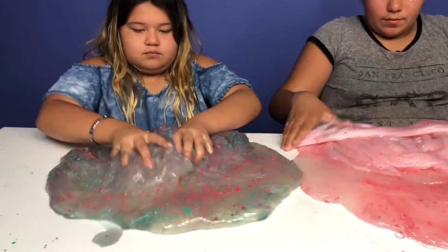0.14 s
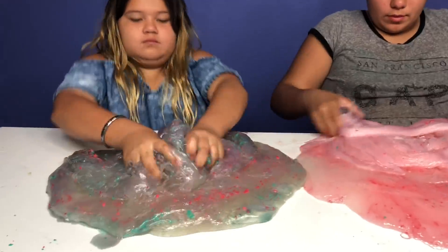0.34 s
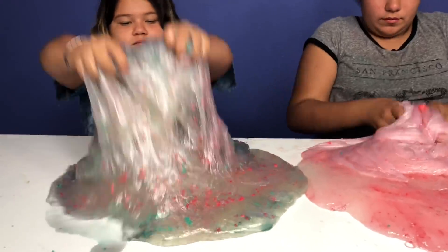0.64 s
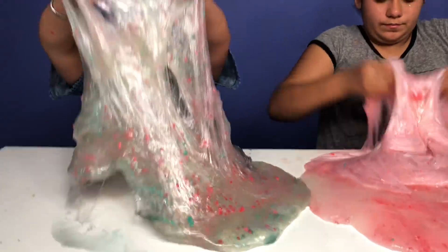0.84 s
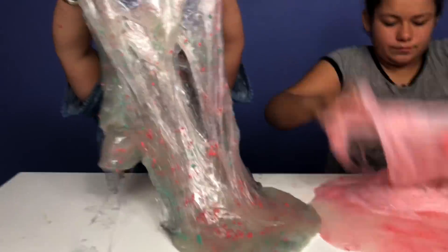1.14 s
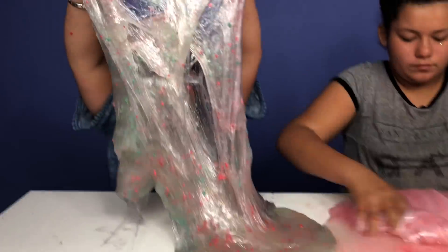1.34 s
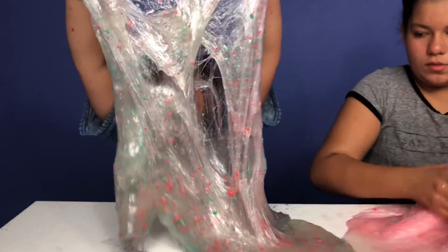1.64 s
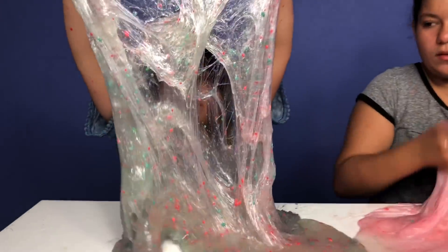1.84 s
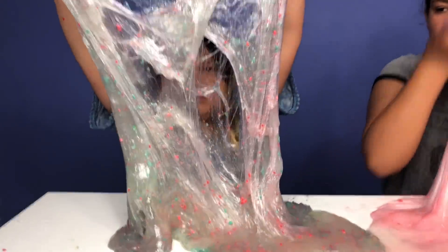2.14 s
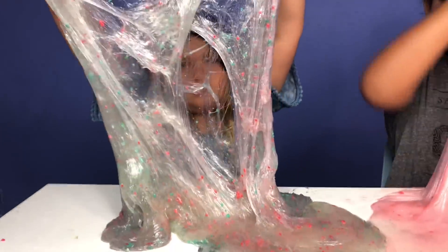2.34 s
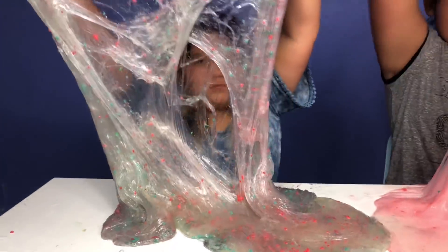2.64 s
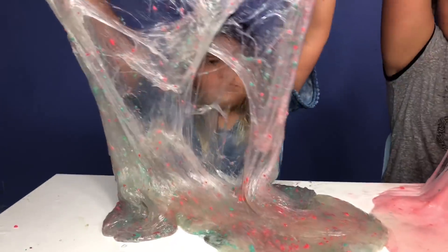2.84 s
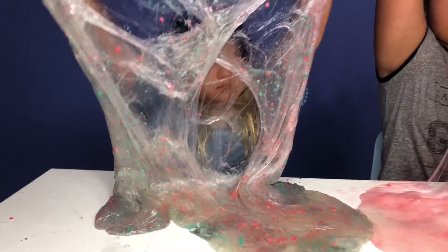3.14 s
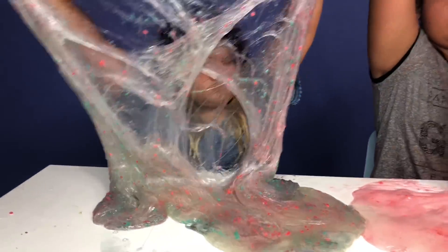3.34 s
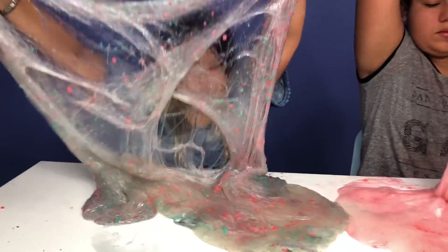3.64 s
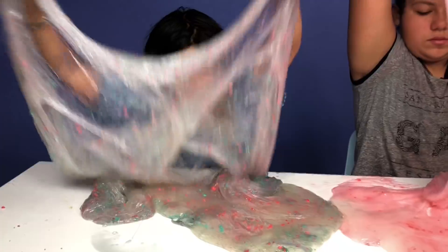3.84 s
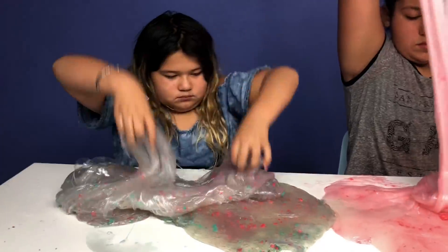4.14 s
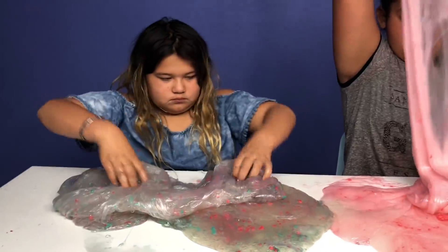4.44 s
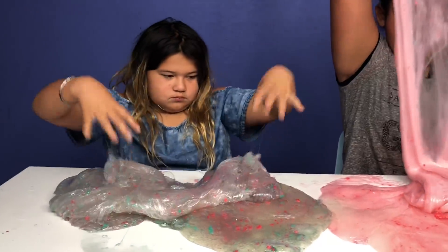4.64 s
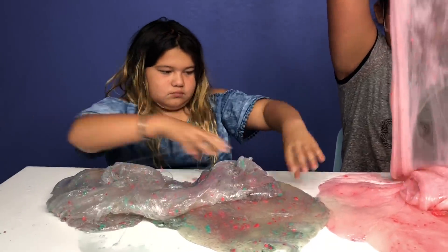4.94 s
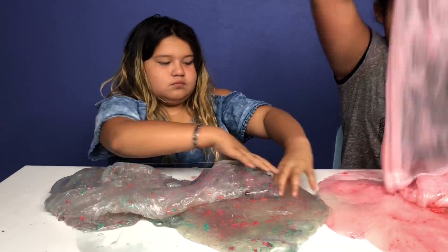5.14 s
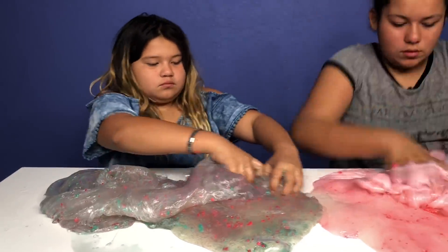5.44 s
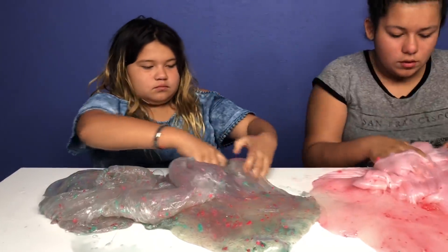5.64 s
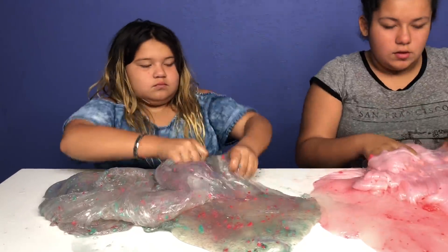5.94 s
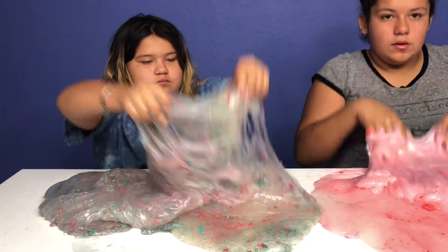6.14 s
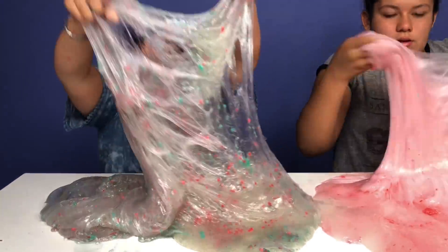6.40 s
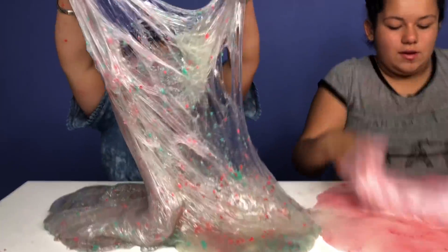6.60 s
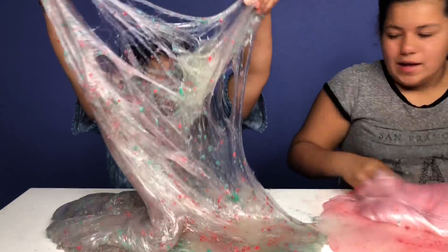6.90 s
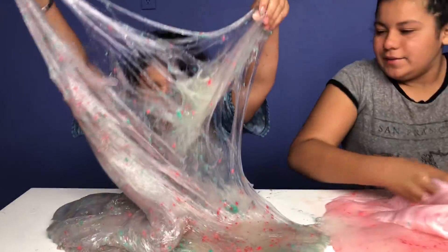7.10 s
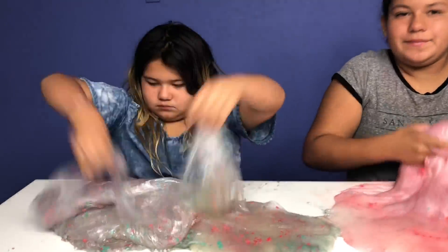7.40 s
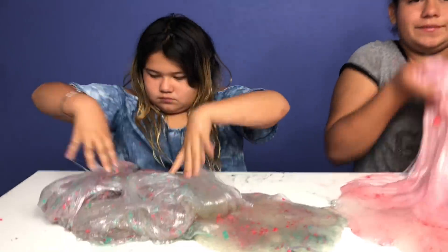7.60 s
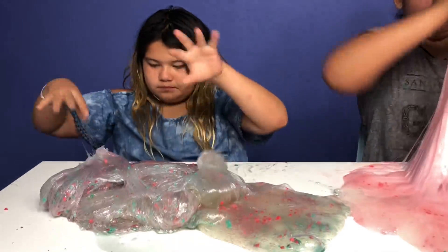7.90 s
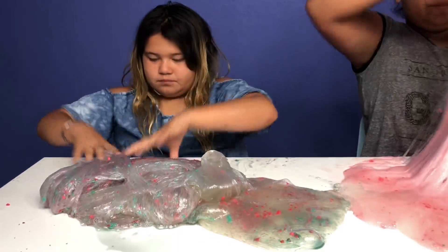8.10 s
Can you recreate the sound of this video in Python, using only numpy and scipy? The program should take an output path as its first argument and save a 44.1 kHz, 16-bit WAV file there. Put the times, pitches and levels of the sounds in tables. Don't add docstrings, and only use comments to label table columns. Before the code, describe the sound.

Dense fizzing and irregular bright snaps burst from sticky slime, with soft wet kneading, a hard slap midway and short room echoes.

```python
import sys
import numpy as np
from scipy import signal
from scipy.fft import rfft, irfft
from scipy.io import wavfile
from scipy.ndimage import uniform_filter1d

SR = 44100
rng = np.random.default_rng(int(sys.argv[2]) if len(sys.argv) > 2 else 0)


def decibels_to_gain(level_db):
    exponent = np.asarray(level_db, float) / 20
    return 10 ** exponent


def persist_wave(psi):
    counts = np.round(np.clip(psi, -1, 1) * 32767).astype(np.int16)
    wavfile.write(sys.argv[1], SR, np.atleast_2d(counts).T)


N = 364266


def rms_one(x):
    return x / np.sqrt(np.mean(x ** 2) + 1e-20)


def at_hz(points, hz):
    table_hz, values = np.transpose(points)
    return np.interp(np.log(hz), np.log(table_hz), values)


def in_time(rows):
    s, *columns = np.transpose(rows)
    return [np.interp(np.arange(N) / SR, s, column) for column in columns]


def band(x, low_hz, high_hz):
    edges = [low_hz, min(high_hz, .48 * SR)]
    return signal.sosfilt(signal.butter(2, edges, "band", fs=SR, output="sos"), x)


def ring(clicks, hz, t60):
    r, w = decibels_to_gain(-60 / (t60 * SR)), 2 * np.pi * hz / SR
    return signal.lfilter([0, np.sin(w)], [1, -2 * r * np.cos(w), r * r], clicks + 1e-18)


def drift(rate, size=N):
    r = np.exp(-80 * np.pi * rate / SR)
    noise = rng.standard_normal(N // 40 + 2002)
    slow = signal.lfilter([1], [1, -2 * r, r * r], noise)[2000:]
    rounded = 1.8 * np.tanh(rms_one(slow) / 1.6)
    return np.interp(np.arange(size) / 40, np.arange(len(slow)), rounded)


def add(out, sound, s):
    i = round(s * SR)
    out[i:i + len(sound)] += sound[:max(N - i, 0)]


def grains(colour, per_s, spread_db, cycles, clump_db, patchy_db, wash, low_hz, high_hz, size=N):
    sizes = decibels_to_gain(spread_db * np.minimum(rng.exponential(1, size), 3.2)) * rng.choice([-1, 1], size)
    born = rng.random(size) < per_s * decibels_to_gain(clump_db * drift(9, size=size)) / SR
    dealt = rng.integers(0, 16, size)
    white = rng.standard_normal((2, size))
    patches = [patchy_db * drift(7.7, size=size) for _ in range(4)]
    out, power = 0, 0
    for k, hz in enumerate(np.geomspace(low_hz, high_hz, num=16)):
        bursts = rms_one(sizes * born * (dealt == k))
        echoes = wash * min(1, 5000 / hz) * white[k % 2]
        rung = rms_one(ring(bursts + echoes, hz, cycles / hz))
        gain = decibels_to_gain(colour(hz)) * np.sqrt(hz)
        out = out + gain * rung * decibels_to_gain(patches[k // 4])
        power = power + gain ** 2
    return out / np.sqrt(power)


# time in seconds, level in dB.
FIZZ_VIGOUR = [(0.0, -48), (0.66, -44.5), (2.32, -44), (3.08, -47), (3.57, -46), (3.75, -48.5),
               (4.19, -47.5), (4.37, -49.5), (4.95, -49), (5.22, -49.5), (5.45, -50.5), (5.73, -50.5),
               (5.96, -47.5), (6.23, -41.5), (6.46, -46.5), (6.83, -40.5), (7.01, -45), (8.26, -48.5)]
# frequency in Hz, level in dB per Hz.
FIZZ_COLOUR = [(900, -9), (1600, -8.5), (2500, -10), (4000, -4), (6300, 1), (8000, 1.5), (10000, -3),
               (12500, -13), (15000, -18)]


def fizz(fizz_db):
    level_db = -1.5
    tilt_db = 0.15 * (fizz_db - fizz_db.mean())
    colour = lambda hz: at_hz(FIZZ_COLOUR, hz) + tilt_db * np.log2(hz / 5000)
    bursts = grains(colour, per_s=2600, spread_db=3.8, cycles=11, clump_db=4, patchy_db=1.3,
                    wash=1, low_hz=875, high_hz=15000)
    return decibels_to_gain(fizz_db + level_db) * band(bursts, 1470, 20600)


# frequency in Hz, level in dB per Hz.
KNEAD_COLOUR = [(88, -44), (150, -25), (286, 0), (431, 4.5), (1410, 2.5), (2620, 2.5), (2830, 1.5),
                (3500, -4.5), (4550, -46), (7700, -120)]
# time in seconds, kneading effort in dB, weight on the table in dB.
HANDS_WORK = [(0.0, -52.5, -65), (0.41, -51, -62), (0.78, -46.5, -78), (1.03, -52, -68), (2.39, -54, -67),
              (2.55, -56, -74), (2.81, -63, -64), (4.51, -55, -64), (4.88, -62.5, -66), (5.15, -61, -63),
              (5.57, -41.5, -74), (5.82, -56, -63), (6.3, -54, -61), (7.29, -54.5, -57), (7.43, -51, -53),
              (7.66, -51.5, -61), (7.94, -53, -68), (8.26, -56, -56)]


def kneading(knead_db):
    level_db = -1.5
    tilt_db = -0.07 * (knead_db - knead_db.mean())
    colour = lambda hz: at_hz(KNEAD_COLOUR, hz) + tilt_db * np.log2(hz / 700)
    wet = grains(colour, per_s=1500, spread_db=3.7, cycles=10.2, clump_db=1.2, patchy_db=1.3,
                 wash=0.62, low_hz=130.5, high_hz=3500)
    return decibels_to_gain(knead_db + level_db) * wet


def rumble(weight_db):
    level_db = -7
    white = rng.standard_normal(N)
    resonances = 0.035 * ring(white, 80, 0.064) + 0.082 * ring(white, 135, 0.047)
    return decibels_to_gain(weight_db + level_db) * rms_one(band(white, 50, 190) + resonances)


def hiss():
    return decibels_to_gain(-69) * rms_one(band(rng.standard_normal(N), 250, 14000))


def strays(fizz_db):
    per_s, over_fizz_db, spread_db = 8, 13, 16
    low_hz, high_hz, cluster_s = 3000, 12500, 0.1
    draws = rng.random((int(per_s * N / SR), 4))
    clusters = np.repeat(draws[::3, 0], 3)[:len(draws)]
    starts = clusters * (N / SR - cluster_s) + cluster_s * draws[:, 3]
    return [(s, fizz_db[int(s * SR)] + over_fizz_db - spread_db * weak, low_hz * (high_hz / low_hz) ** pitch)
            for s, (weak, pitch) in zip(starts, draws[:, 1:3])]


# start in seconds, peak in dB, pitch in Hz, width in octaves,
# room share in dB (more from pockets facing away).
LOUD_POPS = [(0.6925, -9.5, 9100, 1.7, 0), (1.038, -17, 3440, 0.97, 6), (0.0098, -22.5, 5050, 1.5, -3),
             (1.2932, -17.5, 6340, 1.2, 12.5), (1.2946, -25, 520, 2.7, 3), (1.318, -13, 5500, 2.5, 2),
             (1.3219, -12.5, 1480, 1.6, 4), (2.1047, -14, 4180, 1.1, 3), (2.607, -13, 7500, 1.5, 1),
             (2.9753, -11.5, 5670, 0.99, 1), (3.2656, -5, 6740, 1.37, -2.5), (3.2666, -3, 8400, 1.8, 4.5),
             (3.7086, -18, 6700, 2.5, 10.5), (4.001, -3.5, 8470, 1.17, 1), (4.2546, -14.5, 5390, 0.98, 0),
             (5.2995, -15, 5670, 1.1, 7), (5.3576, -12.5, 7360, 2.7, 10), (5.5051, 0.5, 6570, 2.2, -0.5),
             (5.503, -11, 4600, 1.4, 2), (6.1718, -1, 9600, 2.7, -3), (6.4669, -12, 6140, 2.1, 4.5),
             (6.7017, -15, 6500, 1.3, 13), (6.7034, -13.5, 6060, 1.5, 9.5), (6.714, -10, 2860, 2.3, 5),
             (6.7218, -17, 850, 2.1, 7.5), (7.5462, -29, 1500, 1.2, 7), (7.5515, -38, 1500, 1.2, 2),
             (6.9784, -10.5, 7900, 2.3, 7), (7.3196, -15, 2870, 1.76, 2.5), (7.4858, -14, 5260, 0.36, -1),
             (7.5084, -17, 5500, 2.8, 5), (7.646, -14, 3980, 2.3, 5.5), (7.7319, -18, 2300, 2.6, 1.5)]
# start in seconds, peak in dB, pitch in Hz.
SMALL_POPS = [(0.162, -23, 6900), (0.3328, -22, 11300), (0.421, -18, 11640), (0.4735, -21, 5130),
              (0.494, -19, 4400), (0.7835, -23.5, 5800), (1.144, -23, 6570), (1.482, -21, 10100),
              (1.633, -21, 6500), (1.8124, -21, 9500), (3.0465, -20.5, 7200), (4.8266, -22, 6160),
              (5.2817, -21, 7500), (6.086, -21.5, 5850), (6.148, -22, 11300), (6.185, -19, 10800),
              (6.412, -18, 4750), (6.5033, -21.5, 5000), (6.577, -22.5, 10000), (6.6599, -21, 5670),
              (6.686, -26, 4970), (6.693, -25, 5900), (6.724, -13, 3860), (6.8157, -24, 8700),
              (6.919, -17, 6980), (6.9265, -17, 7600), (7.682, -20, 6340), (7.91, -29, 6000),
              (8.148, -19, 8400), (8.259, -23, 4270),
              (0.11, -27, 6200), (0.644, -31, 4300), (1.227, -29, 6800), (1.353, -20, 5840),
            (1.763, -29, 6170), (1.886, -26.5, 5000), (2.184, -29, 5900), (2.2806, -29, 8250),
            (2.443, -20.5, 8500), (2.5816, -28, 5770), (2.7629, -26, 5870), (2.8602, -27.5, 7200),
            (2.953, -21.5, 8000), (3.514, -24, 8100), (3.6448, -26.5, 7000), (3.91, -29, 8300),
            (4.121, -25, 12500), (4.2148, -30, 11000), (4.3438, -25, 7700), (4.8988, -25, 8850),
            (5.0253, -31, 9600), (5.197, -30, 9500), (5.2185, -28, 8140), (5.2542, -26.5, 4670),
            (5.798, -25, 5600), (5.997, -25, 8150), (6.8872, -25, 7640), (7.232, -23, 8000),
            (7.403, -26.5, 6500), (8.0218, -27.5, 5040)]
# start in seconds, peak in dB, pitch in Hz.
STRAND_TICKS = [(0.129, -37, 1170), (0.582, -30, 1170), (0.587, -31, 3070), (0.707, -30.5, 2520),
                (0.9474, -27, 2740), (1.149, -34.5, 1850), (1.685, -34, 1490), (1.687, -25.5, 3800),
                (2.0553, -27.5, 2900), (2.128, -29, 3450), (2.731, -34, 3000), (2.953, -26, 3380),
                (3.069, -29, 3480), (3.466, -42, 2760), (3.6861, -33, 1980), (3.8031, -30.5, 1340),
                (4.047, -31.5, 3620), (4.498, -39, 2550), (4.8715, -30, 3240), (5.1642, -31.5, 2880),
                (5.281, -41, 1580), (5.3672, -22, 3750), (5.425, -34, 1030), (6.0505, -24, 3120),
                (6.3216, -25.5, 4300), (7.1431, -32, 1710), (7.1799, -25, 4570), (7.187, -38.5, 960),
                (7.8883, -29.5, 3700), (8.2154, -35.5, 1690)]
# start in seconds, level in dB, pitch in Hz.
FIZZ_SNAPS = [(0.0097, -44, 5150), (0.1, -36, 5080), (0.2735, -32, 5150), (0.2826, -37, 12500),
              (0.3452, -34, 12500), (0.3629, -37, 12500), (0.5367, -30, 4130), (0.7747, -34, 2650),
              (0.8106, -32, 12500), (0.8403, -34, 12500), (0.8692, -35, 8020), (0.9737, -39, 10010),
              (1.1443, -28, 12500), (1.2858, -32, 2650), (1.3828, -27, 12500), (1.3888, -26, 12500),
              (1.4342, -32, 12500), (1.4412, -28, 12500), (1.5027, -32, 5150), (1.7884, -30, 10010),
              (1.805, -30, 3370), (1.87, -34, 3300), (1.9797, -42, 12500), (2.0663, -30, 6430),
              (2.073, -32, 3300), (2.089, -34, 5150), (2.1161, -40, 12500), (2.1418, -36, 8020),
              (2.1837, -33, 12500), (2.1924, -30, 5150), (2.241, -42, 6430), (2.2683, -33, 12500),
              (2.4317, -33, 6400), (2.4611, -36, 12500), (2.4681, -28, 6430), (2.5053, -31, 10010),
              (2.514, -29, 6430), (2.6404, -34, 5150), (2.731, -30, 8020), (2.7574, -38, 12500),
              (3.0854, -30, 12500), (3.228, -31, 12500), (3.271, -28, 5700), (3.2812, -27, 6430),
              (3.3955, -34, 12500), (3.528, -38, 10010), (3.5531, -31, 12500), (3.5863, -34, 3470),
              (3.6285, -28, 12500), (3.6768, -32, 12500), (3.696, -28, 8020), (3.8352, -39, 12500),
              (3.8509, -41, 4170), (3.9033, -33, 6430), (3.934, -34, 8020), (3.9616, -27, 12500),
              (4.0655, -26, 6500), (4.0797, -33, 12500), (4.243, -32, 6430), (4.444, -38, 6430),
              (4.5603, -33, 12500), (4.568, -33.5, 5150), (4.5988, -31, 5150), (4.6541, -35.5, 12500),
                   (4.688, -34, 12500), (4.7055, -36, 12500), (4.8165, -32, 12500), (4.9357, -38, 12500),
                   (4.944, -30.5, 5200), (4.9806, -37, 12500), (5.0303, -37, 12500), (5.162, -44, 8020),
                   (5.1727, -37, 12500), (5.2278, -35, 5150), (5.3066, -27, 6430), (5.3144, -34, 12500),
                   (5.4857, -33, 5150), (5.522, -30, 3280), (5.6167, -41, 12500), (5.6588, -30, 12500),
                   (5.7259, -31.5, 12500), (5.7898, -41, 12500), (5.8125, -40, 10010), (5.896, -38, 5150),
                   (5.9177, -32.5, 4230), (5.9469, -38, 8020), (5.9696, -36, 10010), (5.995, -31, 12500),
                   (6.068, -27, 6430), (6.2814, -31, 10010), (6.3158, -35, 3350), (6.4999, -23, 12500),
                   (6.5423, -32.5, 2760), (6.597, -26.5, 5150), (6.6089, -30, 6430), (6.705, -23, 12500),
                   (6.826, -26, 5100), (6.8446, -34, 6430), (6.913, -32, 12500), (7.0756, -41, 12500),
                   (7.111, -35, 5150), (7.1485, -34, 2650), (7.1662, -29, 12500), (7.1908, -25.5, 6540),
                   (7.2407, -34, 5150), (7.2704, -33, 12500), (7.3792, -32, 5150), (7.451, -34, 5150),
                   (7.478, -29, 12500), (7.5084, -28, 12500), (7.5717, -36, 12500), (7.6321, -29, 6430),
                   (7.705, -29, 6430), (7.7665, -40, 12500), (7.906, -26.5, 5100), (7.948, -36, 5150),
                   (7.9539, -30, 10010), (8.0514, -31, 12500), (8.0644, -34, 8020), (8.1769, -33, 9900)]
# start in seconds, level in dB, pitch in Hz.
FINGER_CLICKS = [(0.0482, -39, 1700), (0.6512, -38, 2120), (0.9782, -33, 1680), (0.9882, -38, 1700),
                 (1.3273, -26, 1110), (1.6428, -37, 1100), (1.6527, -42, 2120), (1.8345, -44, 700),
                 (1.9284, -41.5, 1100), (2.1288, -37, 1380), (2.3024, -41, 1360), (2.6692, -58, 700),
                 (3.1031, -60, 700), (3.1525, -45, 1110), (3.2358, -45, 1370), (3.4661, -38, 1710),
                 (3.4893, -50, 710), (3.6556, -43, 1700), (3.744, -52, 700), (3.7651, -45, 1700),
                 (4.022, -47, 1100), (4.047, -36.5, 1350), (4.109, -36, 1150), (4.168, -41, 1500),
                 (4.2767, -67, 1090), (4.384, -43, 2120), (4.499, -47, 1090), (4.641, -49, 700),
                 (4.8851, -40, 2120), (4.9924, -67, 1700), (5.0729, -44, 1090), (5.0898, -42, 1090),
                 (5.882, -46, 900), (6.023, -45, 1090), (6.3475, -47, 1360), (6.6221, -47, 1700),
                 (6.6715, -39, 1090), (7.4565, -42, 1090), (8.2164, -32, 860), (8.2295, -42, 694)]


def all_bursts(fizz_db):
    bursts = list(LOUD_POPS)
    for rows, raise_db, width, room_db in [
            (SMALL_POPS, 2, 1.1, -1.5),
            (STRAND_TICKS, 3.5, 1.5, -1.5),
            (FIZZ_SNAPS, 4, 1.27, -2.5),
            (FINGER_CLICKS, 2.5, 1.36, -2.5),
            (strays(fizz_db), 0, 0.45, -2.5)]:
        bursts += [(s, db + raise_db, hz, width, room_db) for s, db, hz in rows]
    return bursts


def burst(hz, width, low, high):
    click = np.arange(500) == 0
    low_hz, high_hz = hz * 2 ** (-.4 * width), hz * 2 ** (0.28 * width)
    crack = band(band(click, low_hz, high_hz), 0.21 * low_hz, 2 * high_hz)
    skirt = band(click, .1 * hz, 1.84 * hz)
    t60 = min(24 / hz / np.sqrt(width), .0045)
    pocket = 0
    for side in (-low, high):
        pocket = pocket + ring(click, min(hz * 2 ** (0.21 * width * side), 15000), t60)
    sound = crack / np.abs(crack).max() + decibels_to_gain(-9) * skirt / np.abs(skirt).max()
    sound = sound + decibels_to_gain(-4) * band(pocket, hz / 3, 3 * hz) / 2
    return sound / np.abs(sound).max()


def pops(fizz_db):
    direct, to_room = out = np.zeros((2, N))
    bursts = all_bursts(fizz_db)
    chances = rng.random((len(bursts), 5))
    for (s, peak_db, hz, width, room_db), (lag, sign, weak, low, high) in zip(bursts, chances):
        crack = decibels_to_gain(peak_db) * np.sign(sign - .5) * burst(hz, width, low, high)
        add(direct, crack, s)
        bounce_db = min(-6.5 + 0.9 * room_db - 10.5 * weak, -5)
        add(direct, -decibels_to_gain(bounce_db) * crack, s + .0006 + .0005 * lag)
        add(to_room, decibels_to_gain(room_db - 2) * crack, s)
    return out


# start in seconds, peak in dB, colour in Hz, smear in seconds, table thump in dB.
SLIME_SLAPS = [(0.219, -37, 255, 0.022, -30), (1.276, -26, 550, 0.014, -52), (1.296, -25, 430, 0.045, -60),
               (1.3225, -20, 1700, 0.014, -25), (1.631, -24, 1420, 0.0049, -35),
               (2.303, -33.5, 380, 0.017, -60), (2.297, -45.5, 1500, 0.061, -78),
               (4.025, -41.5, 555, 0.095, -70), (3.913, -54, 380, 0.014, -76),
               (5.087, -32, 254, 0.028, -33), (5.358, -36.5, 310, 0.025, -66),
               (5.5007, -14, 1070, 0.014, -87), (5.506, -6, 563, 0.0048, -9), (5.876, -38, 221, 0.022, -58),
               (6.169, -44, 700, 0.06, -76), (6.684, -24.5, 1690, 0.027, -41),
               (6.692, -27, 300, 0.038, -46), (6.725, -22.5, 390, 0.046, -13),
               (7.233, -48, 146, 0.011, -62), (7.453, -34, 400, 0.036, -56),
               (7.508, -18, 1240, 0.0038, -48), (7.545, -27, 1400, 0.01, -30),
               (8.178, -37, 1030, 0.0095, -31), (8.214, -23, 500, 0.017, -25)]
# frequency in Hz, level in dB, t60 in seconds.
TABLE_MODES = [(60.5, -13, 0.3), (131.9, -7, 0.41), (192, -35, 0.25), (254, -3.5, 0.39), (368, -11, .15),
               (580, -5, .12)]


def slaps():
    splat, push, t = np.zeros(N), np.zeros(N), np.arange(SR // 5) / SR
    heave = (t / 0.0023) * np.exp(-t / 0.0012)
    noises = rng.standard_normal((len(SLIME_SLAPS), 2, len(t)))
    for (s, peak_db, hz, smear, thump_db), noise in zip(SLIME_SLAPS, noises):
        shape = np.exp(-t / smear) * (1 - np.exp(-t / (0.15 * smear)))
        body = rms_one(band(noise[0], 0.24 * hz, 1.28 * hz))
        spray = rms_one(band(noise[1] ** 3, 1230, 7900))
        heavy_db = max(thump_db - peak_db + 17, 0)
        spray_db = peak_db + 4 + 6 * np.log2(hz / 1000) - 0.99 * heavy_db
        add(splat, shape * (decibels_to_gain(peak_db - 8.5) * body + decibels_to_gain(spray_db - 9.5) * spray), s)
        add(push, heave * decibels_to_gain(thump_db - 37.5), s + 0.01154)
    push = push + decibels_to_gain(-71) * splat
    table = sum(decibels_to_gain(db) * ring(push, hz, t60) for hz, db, t60 in TABLE_MODES)
    return splat, table


# start in seconds, length in seconds, level in dB, first pitch in Hz, last pitch in Hz.
SQUELCHES = [(0.558, 0.24, -44.5, 5600, 3100), (.66, 0.55, -49.5, 2880, 1480),
             (0.261, 0.46, -55.5, 470, 520), (1.627, 0.13, -45.5, 1380, 1400), (2.27, .17, -49, 373, 350),
             (2.3, .13, -52.5, 1360, 1650), (2.4, 0.099, -58, 500, 530), (2.45, 0.063, -50, 1200, 1000),
             (4.025, .07, -51.5, 400, 500), (4.088, 0.033, -47.5, 750, 1170), (3.905, 0.078, -57, 370, 340),
             (7.21, 0.19, -55, 140, 103), (6.16, 0.16, -51, 540, 520), (6.3, 0.084, -51, 570, 510),
             (5.52, .22, -39.5, 1440, 1240), (1.58, 0.22, -55, 270, 230), (1.8, 0.14, -58.5, 223, 200),
             (5.515, 0.19, -42.5, 196, 183), (6.07, 0.069, -53.5, 980, 1100), (7.73, 0.07, -45, 3000, 2850),
             (7.797, 0.18, -52, 1530, 1840)]


def squelch():
    out = np.zeros(N)
    for s, length, level_db, from_hz, to_hz in SQUELCHES:
        gone = np.arange(0, length, 1 / SR) / length
        centre = from_hz * (to_hz / from_hz) ** gone
        lowest, highest = centre.min(), centre.max()
        narrow = lambda hz: -80 * np.log2(hz / centre) ** 2
        wet = grains(narrow, per_s=1200, spread_db=1.6, cycles=22, clump_db=1.2, patchy_db=2, wash=0.55,
                     low_hz=0.75 * lowest, high_hz=1.23 * highest, size=len(gone))
        swell_db = np.interp(gone, [0, .25, 1], [-8, 0, -16])
        envelope = decibels_to_gain(level_db + swell_db) * signal.windows.tukey(len(gone), .2)
        add(out, band(wet, 0.65 * lowest, 2.4 * highest) * envelope, s)
    return out


# frequency in Hz, t60 in seconds.
ROOM_DECAY = [(60, 0.16), (300, 0.44), (1500, 0.66), (5000, 0.68), (14000, 0.44)]
# delay in seconds, level in dB.
WALL_ECHOES = [
    (.0062, -57),
    (0.0124, -22.5),
    (0.0155, -37),
]


def room(x):
    level_db, build_s = -7, 0.0011
    out, edges = np.zeros(N), 40 * 2 ** np.arange(0, 9.1, .5)
    white = rng.standard_normal((2, N))
    build = np.exp(-1 / (build_s * SR))
    for k, (low_hz, high_hz) in enumerate(zip(edges, edges[1:])):
        t60 = at_hz(ROOM_DECAY, np.sqrt(low_hz * high_hz))
        keep = decibels_to_gain(-120 / (t60 * SR))
        heard, noise = band(np.array([x + 1e-9 * white[0], white[k % 2]]), low_hz, high_hz)
        power = signal.lfilter([(1 - keep) * (1 - build)], np.convolve([1, -keep], [1, -build]), heard ** 2)
        out += decibels_to_gain(level_db) * np.sqrt(2 * t60 * np.abs(power)) * rms_one(noise)
    for s, db in WALL_ECHOES:
        add(out, decibels_to_gain(db) * x[:N - round(s * SR)], s)
    return out


def scene():
    (fizz_db,), (knead_db, weight_db) = in_time(FIZZ_VIGOUR), in_time(HANDS_WORK)
    steady = fizz(fizz_db) + kneading(knead_db) + rumble(weight_db) + hiss()
    cracks, cracks_to_room = pops(fizz_db)
    splat, table = slaps()
    skin = decibels_to_gain(-8) * band(splat, 910, 1840)
    echoes = room(cracks_to_room + splat + skin)
    return (steady + cracks + splat + table + squelch() + echoes)[None]


def roll_off(x):
    return signal.sosfilt(signal.butter(12, 16990, fs=SR, output="sos"), x)


# time in seconds, level in dB.
INPUT_OPENING = [
    (0, -12),
    (.011, -14),
    (.021, -30),
    (.027, -13),
    (.034, -6),
    (.05, 1),
]


def record(dry):
    ceiling, mic_top_hz, top_hz, top_opens_db = .7, 17250, 15850, -48
    x = signal.sosfilt(signal.butter(5, 50, "high", fs=SR, output="sos"), dry)
    x = x * decibels_to_gain(in_time(INPUT_OPENING)[0])
    x = ceiling * np.tanh(x / ceiling)
    x = signal.sosfilt(signal.cheby2(22, 55, mic_top_hz, fs=SR, output="sos"), x)
    spectrum = rfft(x)
    hz = np.arange(spectrum.shape[1]) * SR / N
    top = irfft(spectrum * (hz > top_hz), N)
    filled = uniform_filter1d(top ** 2, size=64) > decibels_to_gain(top_opens_db) ** 2
    gate = np.clip(8 * uniform_filter1d(filled * 1., size=320), 0, 1)
    return roll_off(x - top * (1 - gate))


dry = scene()
out = record(dry)
persist_wave(out)
```